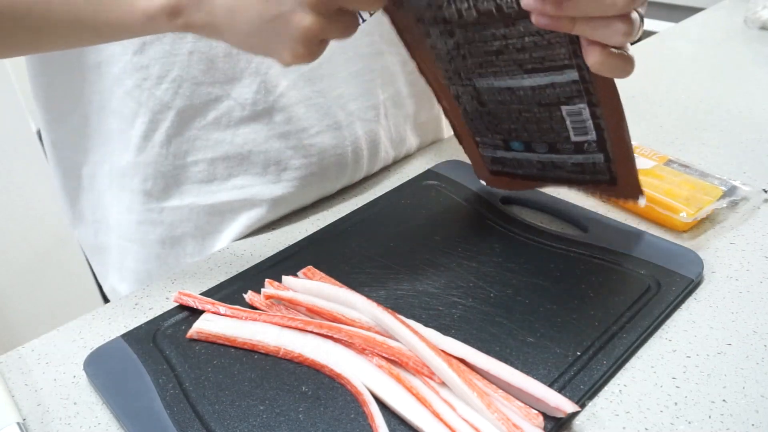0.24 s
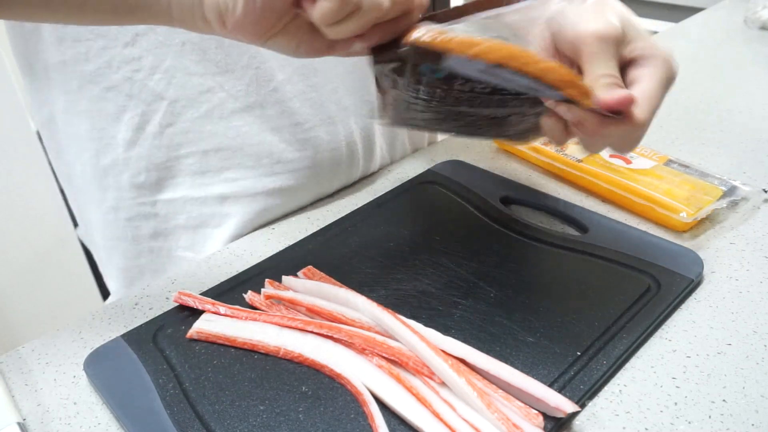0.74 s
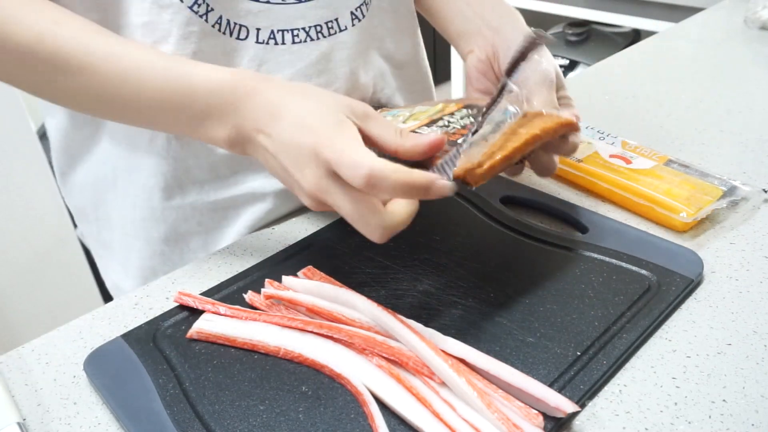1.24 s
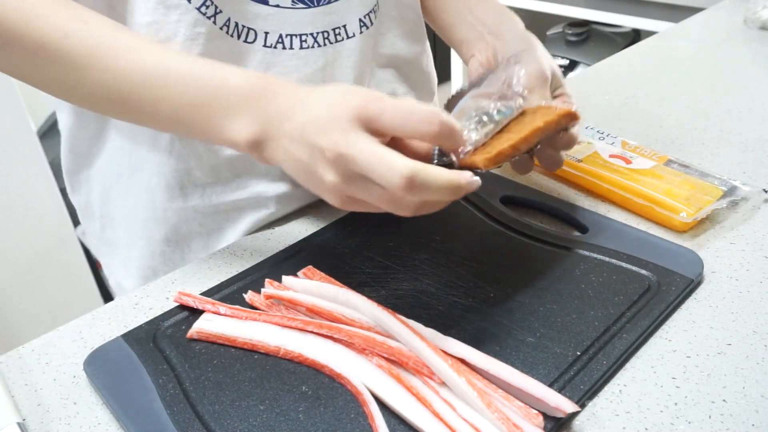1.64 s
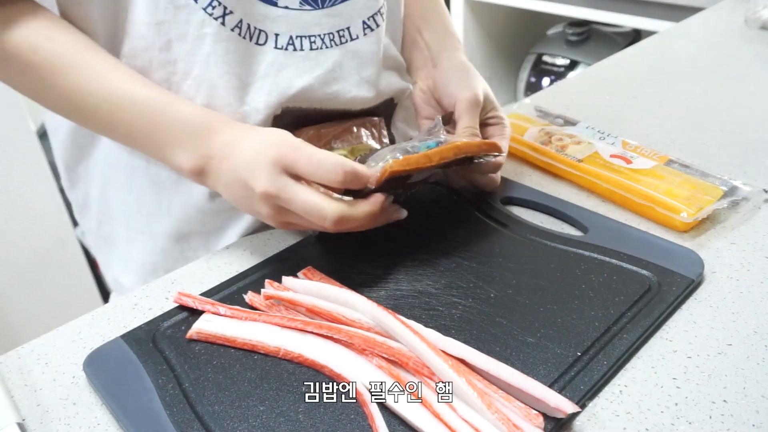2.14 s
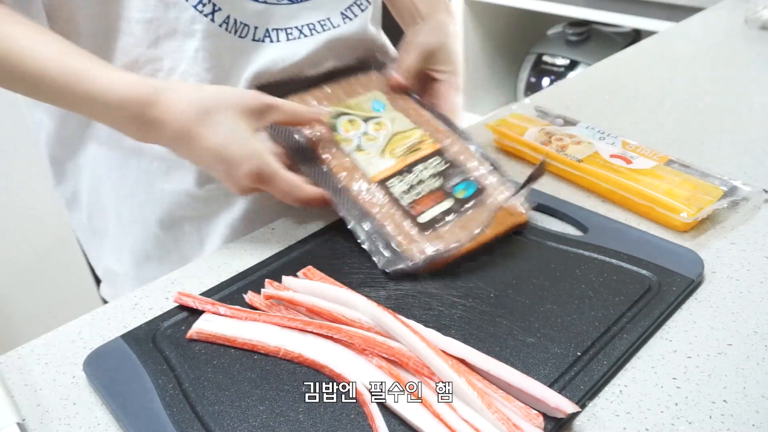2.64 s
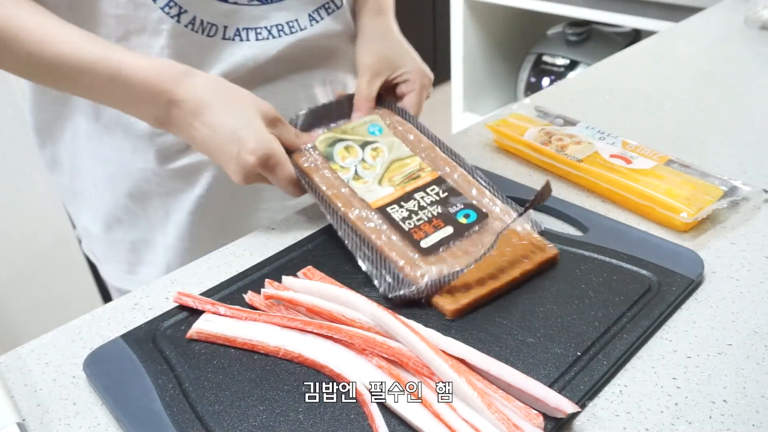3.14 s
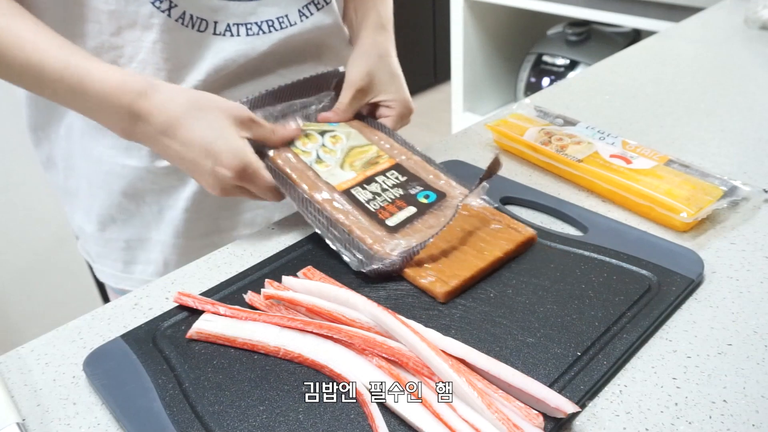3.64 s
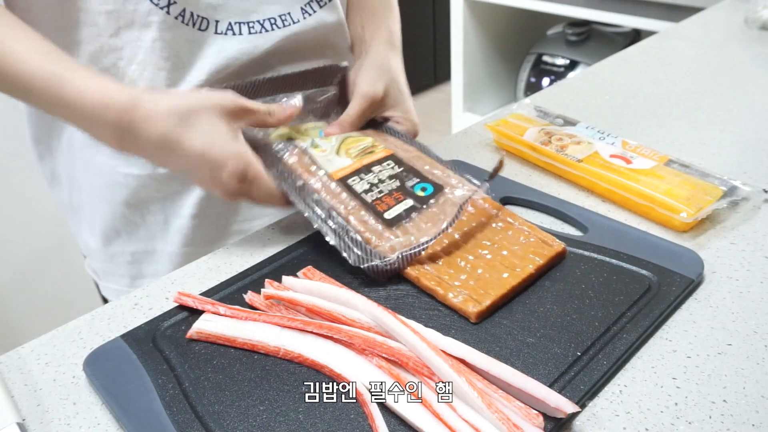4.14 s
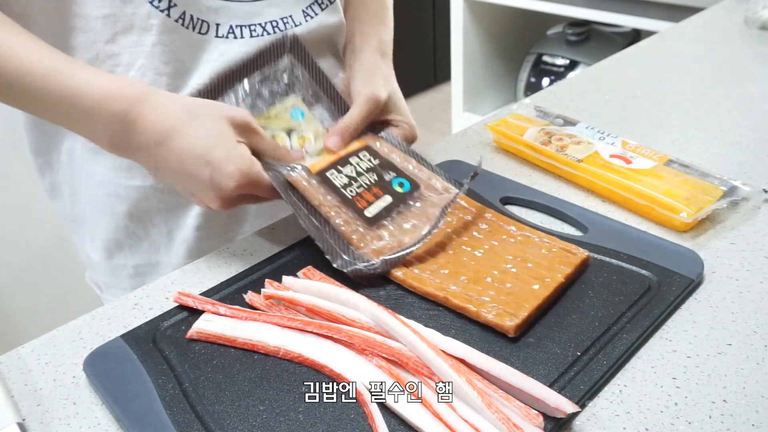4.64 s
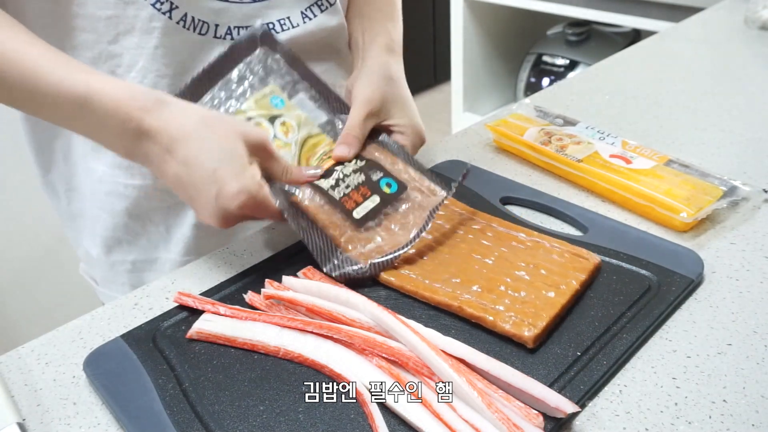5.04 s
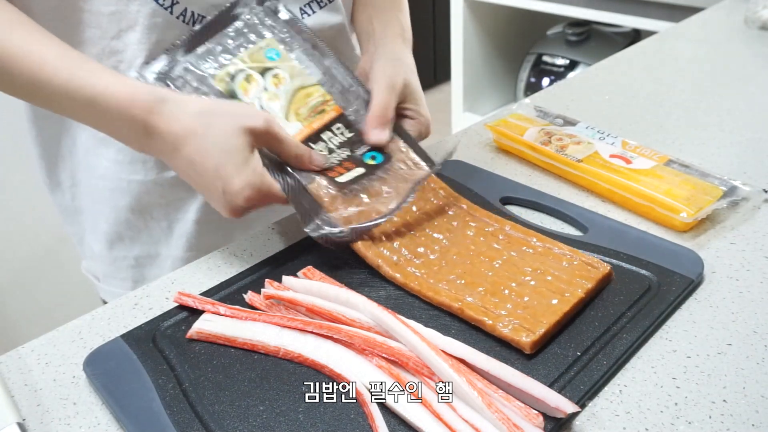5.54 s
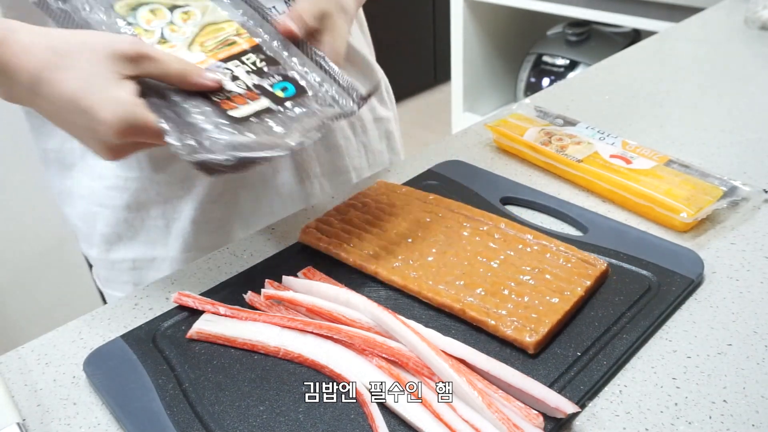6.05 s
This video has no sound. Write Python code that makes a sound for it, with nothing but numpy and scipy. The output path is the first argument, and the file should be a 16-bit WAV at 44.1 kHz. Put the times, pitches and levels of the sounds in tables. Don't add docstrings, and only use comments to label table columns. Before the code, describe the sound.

Stiff plastic food packaging snaps and crackles as hands peel it open, then a soft slab thuds lightly onto a cutting board.

```python
import sys
import numpy as np
from scipy import signal
from scipy.fft import rfft, irfft
from scipy.io import wavfile
from scipy.ndimage import uniform_filter1d

SR = 44100
rng = np.random.default_rng(int(sys.argv[2]) if len(sys.argv) > 2 else 0)


def int16_out(signal):
    q = np.round(np.clip(np.atleast_2d(signal).T, -1, 1) * 32767)
    wavfile.write(sys.argv[1], SR, q.astype(np.int16))


def gain_from_decibels(decibels):
    exponent = np.asarray(decibels, float) / 20
    return 10 ** exponent


N = 277389
LEAN_S = 3.0


def evened(x):
    return x / np.sqrt(np.mean(x ** 2) + 1e-20)


def read(points, hz):
    f, value = np.transpose(points)
    return np.interp(np.log(hz + 1), np.log(f + 1), value)


def add(mix, s, sound):
    part = mix[max(round(s * SR), 0):][:len(sound)]
    part += sound[:len(part)]


def circle(size):
    return abs(np.fft.fftfreq(size, 1 / SR))


def hump(f, hz, width_hz):
    return 1 / (1 + ((f - hz) / (width_hz / 2)) ** 2)


def causal(gain_db):
    log_gain = np.log(gain_from_decibels(np.maximum(gain_db, -100)))
    response = np.fft.ifft(np.exp(np.conj(signal.hilbert(log_gain)))).real
    return response[..., :gain_db.shape[-1] // 2]


def butter(x, order, hz, kind):
    return signal.sosfilt(signal.butter(order, hz, kind, fs=SR, output="sos"), x)


def rings(t, hz, t60_s, turn):
    sines = np.sin(2 * np.pi * (hz * t[:, None] + turn))
    x = (gain_from_decibels(-60 * t[:, None] / t60_s) * sines).sum(1)
    return x * np.minimum(t / 0.0001, 1) / (abs(x).max() + 1e-12)


def air():
    # hz, density_db
    hush_spectrum = [(15, -48), (25, -24), (112, -4), (386, -6), (600, -1.5), (906, -12.5), (2020, -3),
                     (2610, -14), (3130, -11), (3950, -8), (6460, -19.5), (10500, -16), (12000, -49),
                     (15600, -74), (22000, -120)]
    # hz, correlation
    likeness = [(30, 0.33), (100, 0.98), (250, 0.58), (600, 0.23), (3000, 0.067), (11000, 0.93)]
    # hz, width_hz, level_db
    hum_lines = [(109, 1.7, -83.5), (195, 3, -80), (547, 6.2, -80)]
    hush_db = -54.5 - 9.5

    def sounded(z):
        return evened(signal.istft(z, nperseg=2048, noverlap=1536)[1][:, :N])

    frames, hz = N // 512 + 5, np.fft.rfftfreq(2048, 1 / SR)
    a, b, c, d, patches = rng.standard_normal((frames, 1025, 5)).T
    patches_db = 2.4 * evened(uniform_filter1d(uniform_filter1d(patches, 20, 0), 10, 1))
    same = np.clip(read(likeness, hz), -1, 1)[:, None]
    left = a + 1j * b
    right = same * left + np.sqrt(1 - same ** 2) * (c + 1j * d)
    z = np.array([left, right])
    out = gain_from_decibels(hush_db) * sounded(z * gain_from_decibels(read(hush_spectrum, hz)[:, None] + patches_db))
    for f, width_hz, db in hum_lines:
        line = 1 / (1 + ((hz - f) / width_hz) ** 2)
        out += gain_from_decibels(db) * sounded(z * line[:, None])
    return out


def thuds():
    # start_s, peak_db, t60_s, slap_db
    landings = [(0.54, -57, 0.027, 25), (1.994, -30, 0.037, 3.5), (2.079, -33.5, 0.024, 17),
                (4.4, -54, 0.015, -16), (5.321, -48, 0.024, -9), (5.773, -42.5, 0.12, 5),
                (5.81, -43, 0.045, 1), (5.898, -20.5, 0.07, 6.5), (4.53, -50, 0.05, -3),
                (2.36, -52.5, .1, -25), (2.7, -54, 0.087, -18), (2.87, -58, 0.092, -17),
                (4.01, -56, 0.056, -20), (5.974, -33.5, 0.023, -13)]
    # hz, level_db
    board_modes = [(122, -3), (163, -13.5), (203, 2), (255, -1), (330, 1.5), (470, 1), (560, 4), (760, 0),
                   (1150, 16.5)]
    landing_s = 0.003
    out, t = np.zeros(N), np.arange(9000)[:, None] / SR
    hz, mode_db = np.transpose(board_modes)
    phases = rng.random((len(landings), len(board_modes)))
    for (s, db, t60_s, slap_db), u in zip(landings, phases):
        modes = np.sin(2 * np.pi * (hz * t + u)) * (1 - np.exp(-t / landing_s))
        decay_db = -60 * t / t60_s * (hz / 200) ** 0.62
        body = (gain_from_decibels(mode_db + slap_db * (hz > 400) + decay_db) * modes).sum(1)
        add(out, s, gain_from_decibels(db - 0.5) * body / abs(body).max())
    return butter(out, 2, 90, "high")


def leaning():
    level_db, mode_hz, width_hz = -38.5, 212, 44
    resting = np.arange(N) > LEAN_S * SR
    push = rng.standard_normal(N) * uniform_filter1d(gain_from_decibels(grip()[0]) * resting, 2000)
    shape = hump(np.fft.rfftfreq(N, 1 / SR), mode_hz, width_hz)
    return gain_from_decibels(level_db) * irfft(rfft(push) * shape / np.sqrt(np.mean(shape ** 2)), N)


def swishes():
    # start_s, level_db, length_s
    brushes = [
        (2.033, -42.5, 0.047),
        (6.054, -49, 0.11),
    ]
    out = np.zeros(N)
    for s, db, length_s in brushes:
        swell = np.hanning(round(length_s * SR))
        add(out, s, gain_from_decibels(db) * swell * rng.standard_normal(8000)[:len(swell)])
    return butter(out, 2, 4870, "high")


def squeaks():
    # start_s, peak_db, pitch_hz, length_s
    slips = [
        (0.14, -71, 1660, 0.12),
        (.26, -66.5, 1500, 0.12),
        (.12, -68, 560, 0.093),
        (0.38, -64, 550, 0.093),
        (1.265, -56, 1660, 0.088),
        (1.58, -65, 1650, 0.1),
        (2.09, -57.5, 1200, 0.068),
        (0.929, -66, 540, 0.17),
        (2.3, -56, 1650, .05),
        (2.799, -70, 550, 0.18),
    ]
    out = np.zeros(N)
    for s, db, hz, length_s in slips:
        t = np.arange(0, length_s, 1 / SR)
        waver = evened(uniform_filter1d(rng.standard_normal((2, 12000)), 300))[:, :len(t)]
        note = np.sin(2 * np.pi * np.cumsum(hz * (1 + 0.007 * waver[0])) / SR)
        add(out, s, gain_from_decibels(db) * (1 + waver[1]) * note * np.sin(np.pi * t / length_s))
    return out


def grip():
    # start_s, crackle_db, dryness_db
    squeeze = [(0.0, -45.5, 6), (0.37, -148, 8), (0.66, -61.5, -3), (1.82, -59.5, 18.5), (1.89, -62, -7),
               (2.29, -52.5, 15.5), (2.47, -45.5, 8), (2.91, -47, 11.5), (3.15, -54.5, 9), (3.54, -41.5, 0),
               (3.8, -39, 0.5), (4.33, -42, -14), (4.43, -40.5, 0), (4.9, -45, -0.5), (5.12, -39, 1.5),
               (5.38, -44, 3), (5.5, -45.5, -5), (6.29, -56.5, 6)]
    # middle_s, length_s, change_db
    pauses = [(4.21, 0.073, -19), (2.79, 0.11, -5), (1.68, 0.073, -8), (0.81, 0.26, -12), (2.4, 0.066, -6),
              (2.9, 0.19, -8), (5.7, .08, -1.5), (6.0, 0.053, 4.5), (6.23, 0.063, -9), (3.6, 0.25, 7),
              (6.12, 0.092, 6.5), (1.13, 0.26, 3), (5.4, 0.084, 4)]
    after_db, after_t60_s = -35, 0.11
    t, shocks = np.arange(N) / SR, np.zeros(N)
    s, db = buckles()[:2]
    shocks[(s * SR).astype(int)] = gain_from_decibels(2 * (db + after_db))
    settling = signal.lfilter([1], [1, -gain_from_decibels(-120 / (after_t60_s * SR))], shocks)
    at, squeeze_db, dry_db = np.transpose(squeeze)
    still_db = np.zeros(N)
    for middle_s, length_s, change_db in pauses:
        still_db += change_db * np.exp(-(2 * (t - middle_s) / length_s) ** 2)
    level_db = 10 * np.log10(gain_from_decibels(2 * np.interp(t, at, squeeze_db)) + settling) + still_db
    return level_db, np.interp(t, at, dry_db)


def crackle(per_s=2200, spread_db=3.6, clump_db=4.5):
    # hz, density_db
    film_spectrum = [(150, -95), (300, -35.5), (550, -16), (830, -10), (1460, 0), (2230, 6.5), (3080, 0.5),
                     (5090, -13.5), (7000, -21.5), (11300, -21), (22000, -29)]
    level_db, dry_db = grip()
    pocket_db = 4
    fizz_db = 7 + dry_db + 0.45 * (level_db + 40.5)
    clumps = gain_from_decibels(clump_db * evened(uniform_filter1d(rng.standard_normal(N), 500)))
    size = gain_from_decibels(spread_db * np.minimum(rng.exponential(1, N), 4))
    size *= rng.random(N) < clumps * per_s / SR
    scrap, t, out = rng.integers(0, 24, N), np.arange(300) / SR, np.zeros(N)
    for k, u in enumerate(rng.random((24, 2, 12))):
        hz = (600 + 9000 * (k / 24) ** 1.6) * (0.5 + 1.3 * u[0])
        ring = rings(t, hz, 5.2 / hz ** 0.844, u[1])
        out += signal.oaconvolve(size * (scrap == k), ring)[:N]
    spectrum = rfft(out)
    flat = irfft(spectrum / np.sqrt(uniform_filter1d(abs(spectrum) ** 2, 3000) + 1e-9), N)
    film = signal.oaconvolve(flat, causal(read(film_spectrum, circle(2048))))[:N]
    low = butter(film, 2, 1200, "low")
    high = butter(film, 2, 5500, "high")
    mixed = film + (gain_from_decibels(pocket_db) - 1) * low + (gain_from_decibels(fizz_db) - 1) * high
    return gain_from_decibels(level_db + 0.5) * mixed / np.sqrt(np.mean(film ** 2))


def buckles():
    # start_s, peak_db, pitch_hz, tick_db
    panel_snaps = [(0.474, -28.5, 4080, -18), (0.515, -33.5, 1490, -34), (0.917, -24.5, 3160, -28),
                   (1.468, -30.5, 3380, -22), (1.871, -21, 2220, -17), (1.918, -9.5, 2900, -44),
                   (2.511, -6, 2400, -21.5), (2.709, -25, 2220, -27), (2.985, -22, 3300, -21.5),
                   (3.035, -22, 1800, -35), (3.066, -6, 3100, -39), (3.079, -6.5, 2060, -30),
                   (3.21, -7.5, 2130, -18.5), (3.24, -13.5, 2920, -27.5), (3.332, -23.5, 3200, -43),
                   (3.361, -43, 2150, -20), (3.661, -19, 3030, -21), (3.701, -32, 3420, -27),
                   (3.971, -18, 2040, -42), (4.1, -11.5, 2390, -24.5), (4.237, -19, 2960, -50),
                   (4.359, -8.5, 2500, -31), (4.438, -24, 1690, -27), (4.511, -7, 2450, -26),
                   (4.621, -24.5, 1730, -19), (4.785, -23, 2100, -21), (5.016, -22, 2700, -32),
                   (5.454, -8, 2430, -45), (6.212, -33.5, 2080, -33), (6.275, -38, 2300, -8),
                   (.609, -25, 2860, -30), (1.89, -17, 2480, -20.5), (1.933, -23, 2390, -26),
                   (3.883, -16, 2300, -13), (4.509, -20, 2260, -29), (5.903, -13.5, 3720, -26),
                   (5.913, -20, 1490, -27), (1.858, -25, 2300, -25)]
    # start_s, peak_db, pitch_hz, boom_db
    pocket_snaps = [(0.143, -39, 1550, -6), (0.411, -29.5, 2650, 2.5), (1.032, -26.5, 2270, -7),
                    (1.168, -29.5, 2550, 2), (1.427, -26.5, 2110, -5), (1.848, -21, 2110, -0.5),
                    (1.885, -18, 2080, 7), (1.997, -15, 1980, -1), (2.078, -26, 2000, 6.5),
                    (2.168, -35.5, 2200, 37), (2.37, -12, 1930, 1), (3.164, -15, 1580, -15),
                    (3.165, -13, 2190, -1), (3.178, -8.5, 2010, 1), (3.22, -11.5, 1950, -5),
                    (3.775, -12.5, 2320, -3.5), (3.785, -16, 2200, 3), (4.007, -10.5, 2550, -5),
                    (4.686, -26.5, 1700, 3), (4.872, -19, 2250, -2), (4.909, -19.5, 2130, -21),
                    (5.115, -18, 2040, 6), (5.143, -18, 2060, 1), (5.205, -20.5, 2270, -2),
                    (5.231, -18.5, 2200, 0.5), (5.421, -25, 2180, 12), (5.557, -15.5, 1880, -4),
                    (5.609, -22.5, 2210, 4), (5.821, -26, 1720, 4), (5.896, -7.5, 1960, -3)]
    # start_s, peak_db, pitch_hz, tick_db
    crease_snaps = [(0.248, -23, 2460, -11), (0.547, -9, 3000, -10), (0.565, -15.5, 1460, -10),
                    (0.572, -19, 3750, -14), (0.735, -17.5, 3260, -19), (0.887, -27.5, 2340, -12.5),
                    (1.529, -30, 3400, -10), (1.551, -22.5, 2730, 0), (1.559, -21, 2570, -15),
                    (1.67, -44.5, 2280, -8), (1.704, -43, 2190, -14), (1.74, -23, 2500, -12),
                    (2.424, -9.5, 2170, -2), (2.667, -25.5, 2850, -7), (2.683, -14, 2430, -13.5),
                    (2.842, -27.5, 4050, -5), (2.87, -17, 3900, -18.5), (2.952, -23, 2280, -13),
                    (2.967, -23, 3920, -21), (3.349, -10, 2340, -3), (3.604, -8.5, 2930, -13.5),
                    (3.805, -7, 2170, -15.5), (3.834, -16, 1700, -21), (4.311, -14.5, 1720, -9),
                    (4.381, -9.5, 2160, -4.5), (4.882, -23, 2240, -15), (5.15, -12, 2280, -18.5),
                    (5.323, -25, 2850, -18), (5.879, -29, 2070, -5), (6.039, -33, 1720, -20.5)]
    # start_s, peak_db, pitch_hz, tick_db
    fold_snaps = [(0.498, -25.5, 3940, -18), (1.118, -25, 2110, -9), (1.241, -24.5, 3000, -17.5),
                  (1.973, -22, 2170, -10), (2.236, -23, 2180, 4), (2.241, -19, 2900, 3),
                  (2.274, -19, 2090, -12.5), (2.494, -30, 2200, 2), (3.373, -19.5, 2000, -20),
                  (3.56, -21, 1290, -27), (3.571, -13, 1300, -13.5), (3.591, -20, 2850, -14),
                  (3.676, -17.5, 3130, -12.5), (3.871, -8, 2200, -15), (3.911, -10, 3100, -15),
                  (4.051, -15, 1620, -9), (4.269, -16.5, 2650, -9), (4.284, -12.5, 2450, -9.5),
                  (4.301, -15, 2220, -10), (4.53, -13, 1630, -21.5), (4.548, -12.5, 1610, -19.5),
                  (4.587, -13, 2730, -10), (4.72, -19.5, 1760, -23), (4.855, -13, 2160, -2.5),
                  (4.947, -18, 2770, -15), (5.049, -21, 2010, -19), (5.08, -21, 1190, -21),
                  (5.101, -9.5, 2460, -10), (5.326, -14.5, 2780, -13), (5.438, -12, 2940, -13.5)]
    # start_s, peak_db, pitch_hz
    small_snaps = [(0.029, -40, 2060), (0.527, -33, 1120), (0.537, -31, 2840), (0.793, -38, 2270),
                   (1.825, -28.5, 2170), (1.985, -22.5, 2140), (2.253, -29.5, 2750), (2.286, -30, 2160),
                   (2.336, -28.5, 900), (3.05, -24, 1800), (3.249, -16, 1510), (3.324, -30, 2180),
                   (3.416, -44, 3020), (3.455, -24.5, 2800), (3.54, -30, 1300), (3.652, -30, 3000),
                   (3.683, -26, 3080), (4.065, -22, 2220), (4.406, -20, 1810), (4.414, -22, 1960),
                   (4.655, -24, 1540), (4.746, -34, 2750), (4.817, -30, 2230), (5.026, -29, 2580),
                   (5.281, -20.5, 1480), (5.313, -21, 2060), (5.546, -23, 2380), (5.587, -30, 2690),
                   (5.595, -24, 2040), (5.75, -30, 2290)]
    # start_s, peak_db, pitch_hz
    bright_ticks = [(0.555, -17.5, 3920), (1.542, -33, 3930), (1.669, -37, 4070), (1.704, -40, 4090.0),
                    (1.732, -34, 4120), (1.76, -30, 2160), (2.268, -30, 2220.0), (2.494, -24, 1740.0),
                    (2.645, -31, 2200.0), (3.363, -26.5, 4100)]
    # start_s, peak_db, pitch_hz
    deep_ticks = [(1.375, -39.5, 2400), (2.108, -48, 1120.0), (2.117, -55, 1160.0), (2.21, -36, 790),
                  (3.226, -21, 1010), (3.293, -31, 1240), (3.507, -28.5, 824), (3.671, -30, 1080.0),
                  (4.087, -28, 1700), (4.76, -38.0, 930.0), (4.839, -26, 2170.0), (5.428, -28.0, 2500.0),
                  (5.808, -29, 1780), (5.841, -23.5, 1960.0)]
    # start_s, peak_db, pitch_hz
    plain_ticks = [(0.498, -31, 4060), (0.828, -39, 4200), (0.991, -47, 3510.0), (1.159, -42, 2370.0),
                   (1.229, -32.5, 2600), (1.356, -38, 2170.0), (1.455, -43, 3140.0), (2.586, -33.5, 1920.0),
                   (2.622, -31, 2300.0), (2.711, -28, 2210), (2.822, -36, 2370), (2.865, -43, 1890.0),
                   (3.0, -30, 3080.0), (3.131, -28.5, 2740), (3.169, -13.5, 2130), (3.241, -13, 1320),
                   (3.372, -19, 1700), (3.416, -32.0, 2100), (3.521, -36, 2180), (3.588, -26, 2910.0),
                   (3.61, -16, 3000), (3.733, -27, 3350), (3.772, -23, 3040.0), (3.786, -19, 1690),
                   (4.003, -20, 2260), (4.067, -23, 2180), (4.276, -30, 2070), (4.61, -24, 2150.0),
                   (4.974, -30.5, 3040.0), (5.092, -27, 2650.0), (5.096, -24, 3060.0), (5.201, -38, 2130.0),
                   (5.232, -20, 2340), (5.304, -28, 1690), (5.332, -18, 2610.0), (5.337, -28, 3100),
                   (5.351, -20.5, 2110.0), (5.758, -40, 2950), (5.829, -31, 1710), (6.241, -54, 1850.0),
                   (6.246, -45, 1830.0),
                   (1.392, -31, 2170), (2.2387, -35, 2790), (2.349, -37, 2220), (2.3867, -26, 1880),
                  (2.4798, -31, 2210), (2.5314, -24, 1990), (2.5474, -22, 2200), (2.574, -32, 2350),
                  (2.9336, -28.5, 2530), (3.188, -14, 2180), (3.5129, -28, 1850), (3.5845, -12, 2780),
                  (3.5927, -19, 3030), (3.703, -26.5, 3430), (3.7284, -24, 3070), (3.9226, -22, 1780),
                  (3.9289, -29, 1550), (4.0967, -12.5, 2300), (4.1547, -32, 2060), (4.3674, -21.5, 2200),
                  (4.388, -22, 2170), (4.5836, -20, 3040), (4.6302, -25, 2510), (4.6344, -24.5, 853),
                  (4.6908, -25, 2410), (4.8256, -31, 2200), (4.8634, -31, 2200), (4.8827, -19.5, 2180),
                  (5.1314, -21, 2160), (5.1604, -30, 1620), (5.193, -21, 2200), (5.2629, -32, 2210),
                  (5.2729, -22, 1540), (5.3119, -23, 2190), (5.3456, -28, 2200), (5.6092, -26, 2140),
                  (5.7774, -37, 2260), (5.8831, -18, 2100), (6.085, -34, 2930), (6.189, -44, 2220)]
    plain_boom_db, plain_tick_db = -23.5, -24.5
    rows = []
    for snaps_of_kind, boom_db in [(panel_snaps, -36), (crease_snaps, -45), (fold_snaps, -4.5)]:
        rows += [(s, db, hz, boom_db, tick_db) for s, db, hz, tick_db in snaps_of_kind]
    rows += [(*row, -27) for row in pocket_snaps]
    rows += [(*row, plain_boom_db, -11) for row in bright_ticks]
    rows += [(*row, 0, plain_tick_db) for row in deep_ticks]
    rows += [(*row, plain_boom_db, plain_tick_db) for row in plain_ticks]
    rows += [(*row, -1, -22.5) for row in small_snaps]
    return np.transpose(rows)


def snaps():
    panel_width_hz, tick_hz, steps_s = 1050, 6800, 0.003
    rattle_db, hiss_db = -23, -13
    spread_db, spread_s = 2.5, 0.00004
    out, f, t = np.zeros((2, N)), circle(1024), np.arange(1200) / SR
    s, db, hz, pocket_db, tick_db = buckles()[:, :, None]

    panel = hump(f, hz, panel_width_hz) ** 2.2 + gain_from_decibels(-17.0) * hump(f, 3047, 3150) ** 2
    pocket = gain_from_decibels(2 * pocket_db + 0.5) * hump(f, 900, 520) ** 2
    treble = f ** 6 / (f ** 6 + tick_hz ** 6)
    tick = gain_from_decibels(2 * tick_db - 10) * (gain_from_decibels(-4) * hump(f, 3500, 2600) + treble)
    bass_cut = f ** 4 / (f ** 4 + 865.0 ** 4)
    colour = causal(10 * np.log10((panel + pocket + gain_from_decibels(-4.5) * tick) * bass_cut + 1e-9))

    rattle_s = 0.024 + 0.031 * gain_from_decibels(np.minimum(pocket_db, 0))
    drive = gain_from_decibels(rattle_db - 60 * t / rattle_s) * rng.standard_normal((len(s), len(t)))
    kicks = rng.random((len(s), 2, 6))
    kick_at = (kicks[:, 0] * steps_s * SR * np.array([0.03, 0.1, 0.25, 0.5, 0.75, 1])).astype(int)
    kick_size = [0.7, -1, 0.6, -0.45, 0.35, -0.3] * np.sqrt(kicks[:, 1])
    np.put_along_axis(drive, kick_at, kick_size, 1)
    tear = gain_from_decibels(hiss_db - 60 * t / 0.03) * rng.standard_normal(drive.shape) * np.minimum(t / 0.001, 1)

    sounds = signal.fftconvolve(drive, colour, axes=1)
    sounds += signal.fftconvolve(tear, causal(10 * np.log10(tick + 1e-9)), axes=1)
    sounds *= gain_from_decibels(db + 1.0) / abs(sounds).max(1, keepdims=True)
    for at, sound, place in zip(s[:, 0], sounds, rng.uniform(-1, 1, len(s))):
        add(out[0], at - place * spread_s, gain_from_decibels(place * spread_db) * sound)
        add(out[1], at + place * spread_s, gain_from_decibels(-place * spread_db) * sound)
    return out


def kitchen(x):
    # hz, t60_s
    room_t60 = [(300, 0.26), (800, 0.32), (2500, 0.24), (6000, 0.45), (11000, 0.23)]
    size, out = SR // 2, np.zeros((2, N))
    for k in range(3):
        taps = np.zeros((2, size))
        at = np.arange(80, size - 20, 20) + rng.integers(0, 20, (2, (size - 81) // 20))
        np.put_along_axis(taps, at, rng.choice([-1., 1.], at.shape), 1)
        hz, t, z = signal.stft(taps, SR, nperseg=256)
        tail = signal.istft(z * gain_from_decibels(-60 * t / read(room_t60, hz)[:, None]), SR, nperseg=256)[1]
        counter_top = 0.3 * taps.sum(0) * gain_from_decibels(-60 * np.arange(size) / SR / 0.035)
        tail = tail[:, :size] + counter_top
        tail += signal.lfilter([0.06], [1, -0.94], 4.77 * (tail.mean(0) - 0.12 * tail))
        turn = np.sqrt(2 / 3) * np.cos(np.pi * (7 * np.arange(N) / SR + k / 3))
        out += signal.fftconvolve((x * turn)[None], tail / np.linalg.norm(tail[0]), axes=1)[:, :N]
    return out


def ports(x):
    # hz, lead_rad
    port_lead = [(0, -1), (1380, 1.04), (3010, 0.83), (5600, 2), (8010, 2), (10900, 0.6), (11900, -1.5)]
    # hz, balance_db
    port_balance = [(60, -1), (250, 0), (500, -2), (1420, -3.5), (4090, -2.5), (11700, -1)]
    hz = np.fft.rfftfreq(N, 1 / SR)
    half = gain_from_decibels(read(port_balance, hz) / 2) * np.exp(0.5j * read(port_lead, hz))
    return irfft(rfft(x) * np.array([half, 1 / half]), N)


def scene():
    pack = snaps() + crackle() + squeaks() + swishes()
    board = thuds() + leaning()
    held_up = np.arange(N) < LEAN_S * SR
    pan_db = -1 * held_up * np.array([[0.5], [-0.5]])
    echoes = kitchen(gain_from_decibels(-6.0) * pack.mean(0) + gain_from_decibels(-4) * board)
    return ports(pack) * gain_from_decibels(pan_db) + board + ports(echoes) + air()


def low_pass(x):
    return signal.sosfilt(signal.butter(12, 12340, fs=SR, output="sos"), x)


def record(dry):
    edge = signal.sosfilt(signal.cheby1(9, 1, 10830, fs=SR, output="sos"), dry)
    return low_pass(edge)


dry = scene()
out = record(dry)
int16_out(out)
```